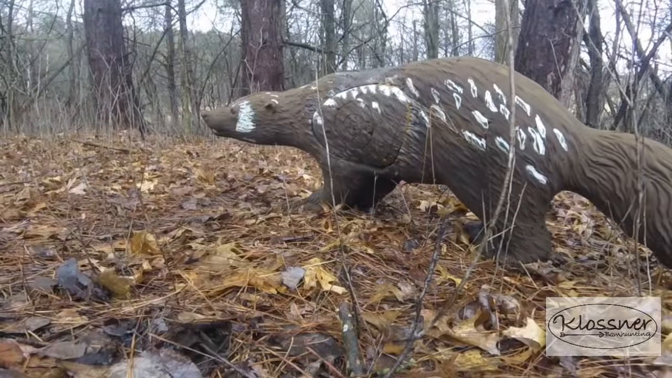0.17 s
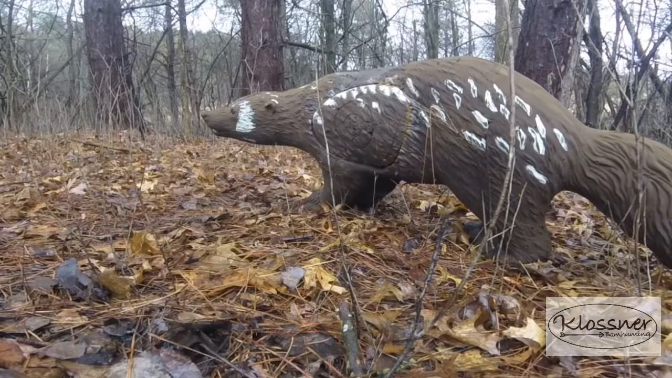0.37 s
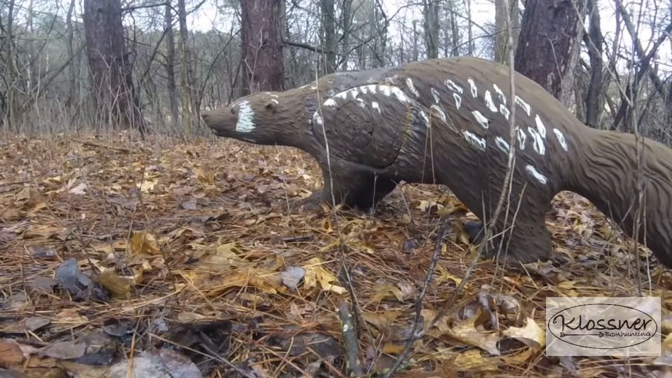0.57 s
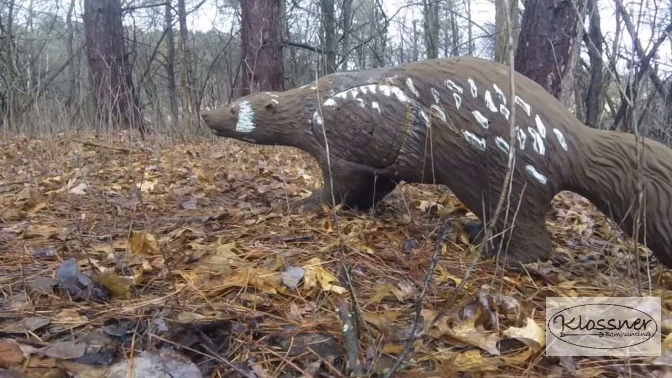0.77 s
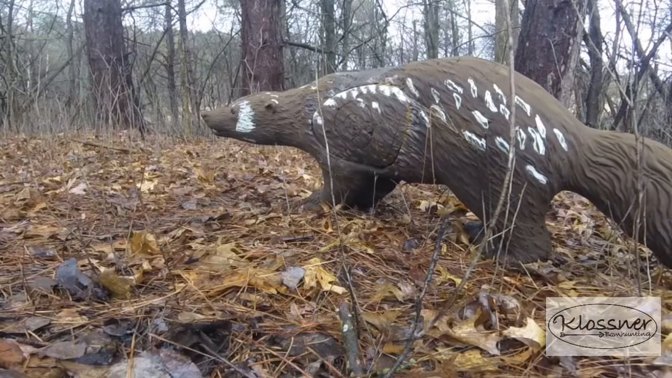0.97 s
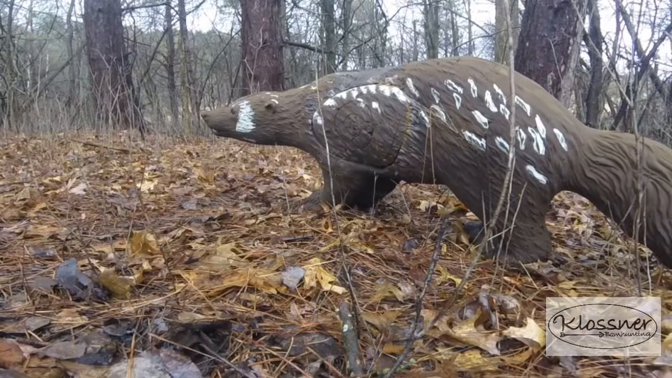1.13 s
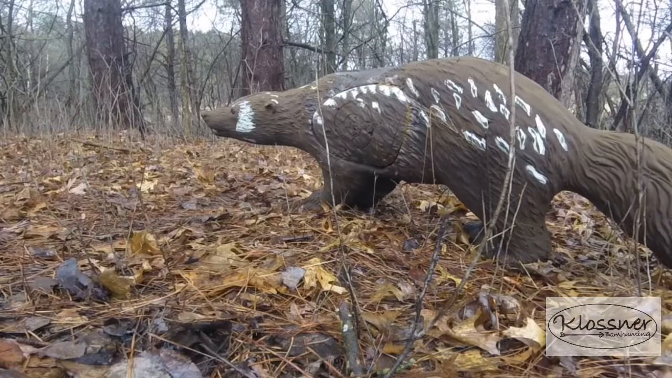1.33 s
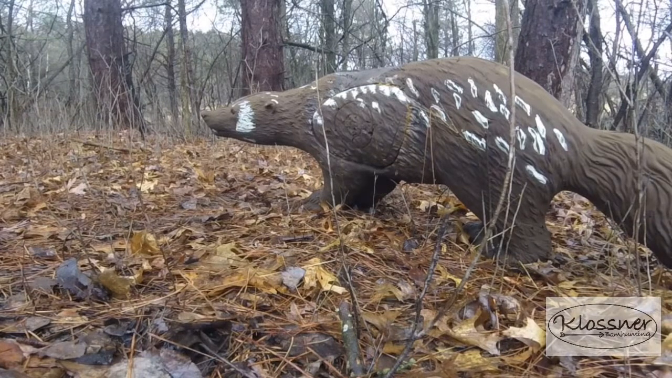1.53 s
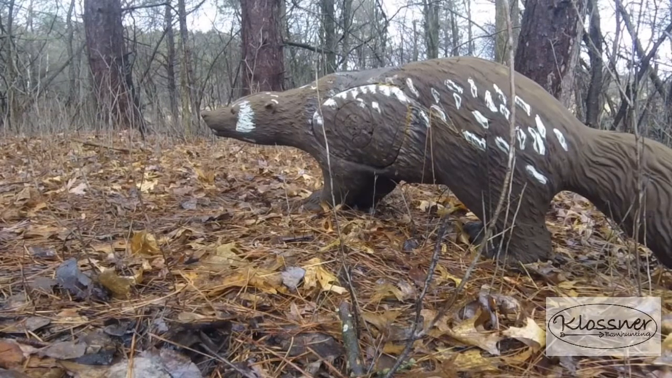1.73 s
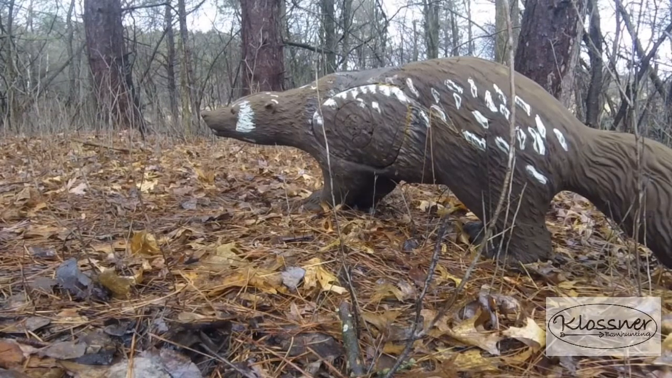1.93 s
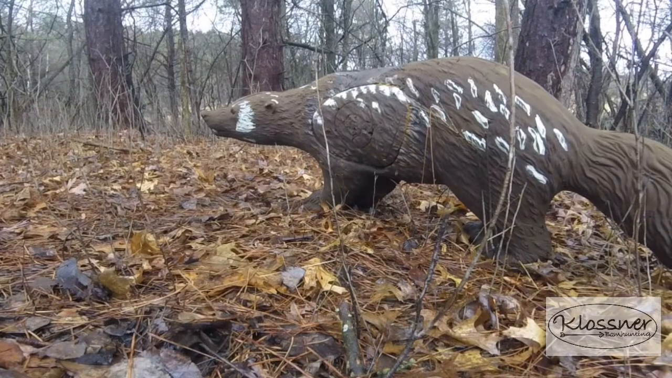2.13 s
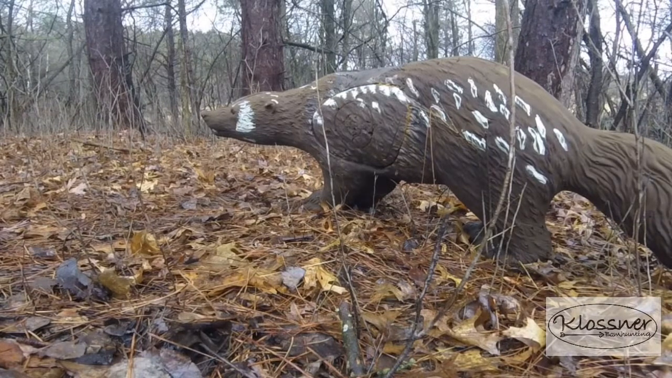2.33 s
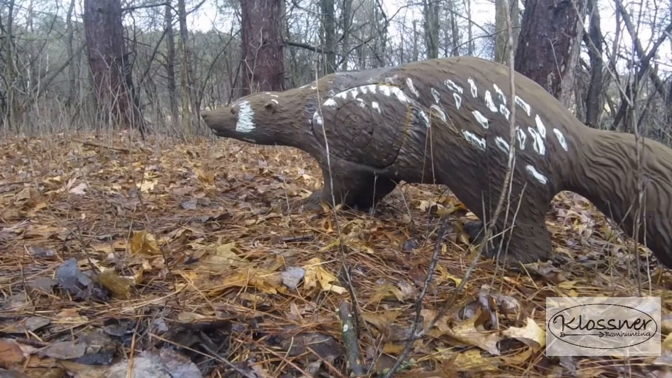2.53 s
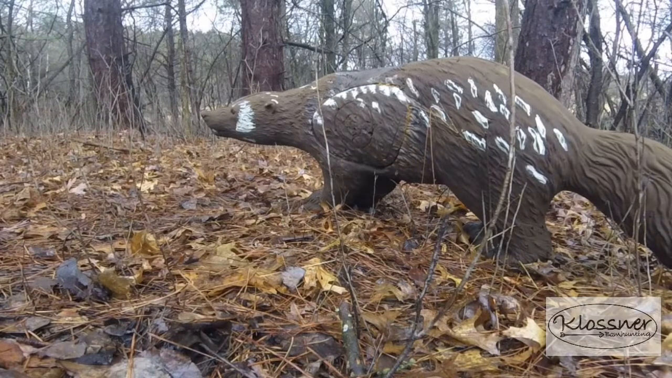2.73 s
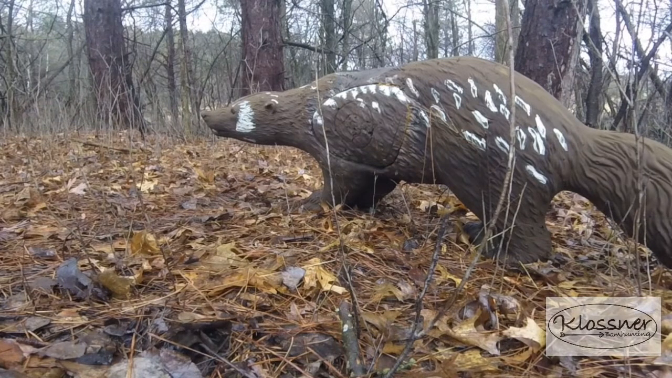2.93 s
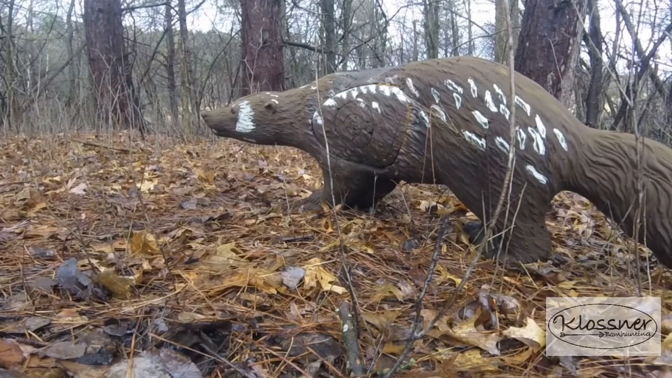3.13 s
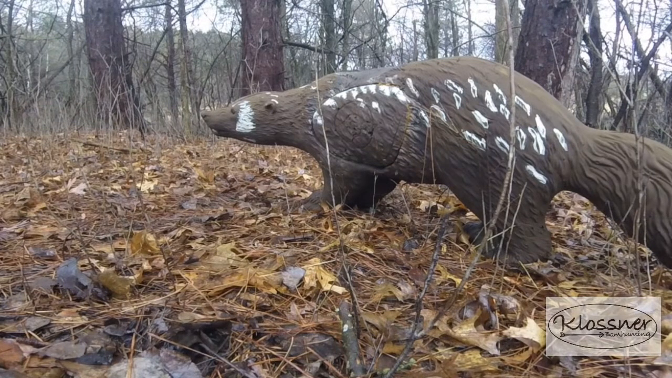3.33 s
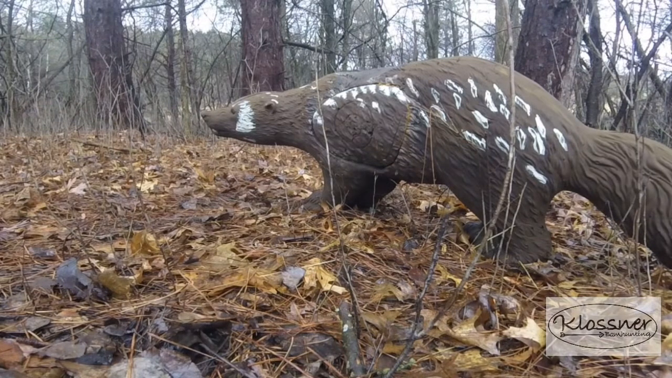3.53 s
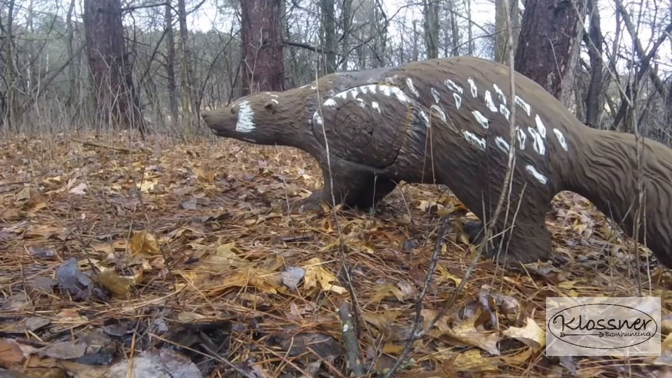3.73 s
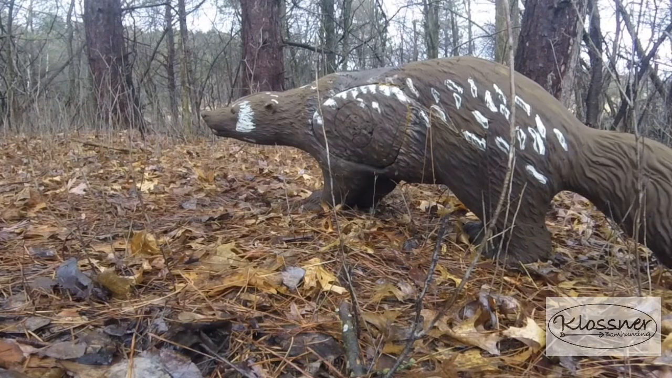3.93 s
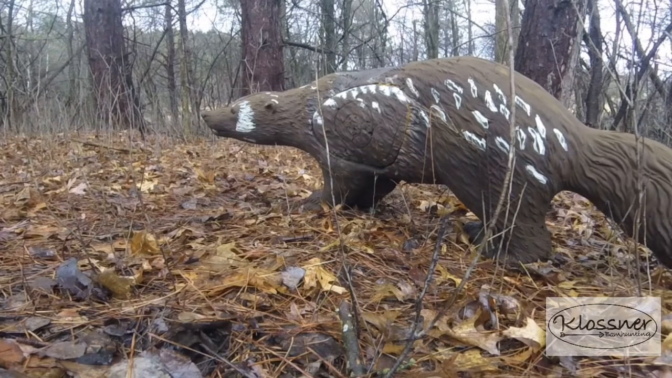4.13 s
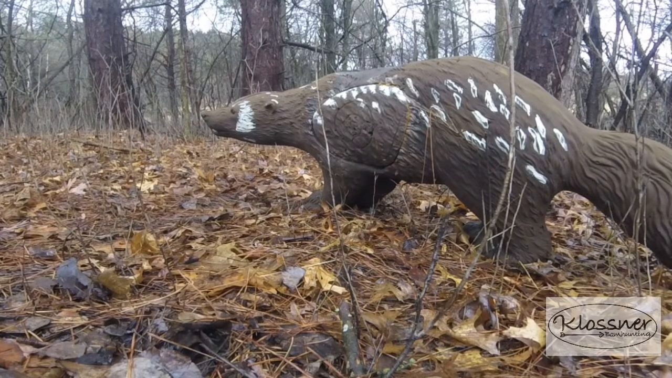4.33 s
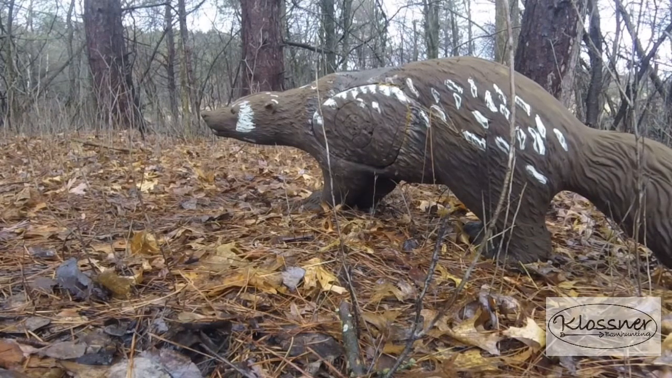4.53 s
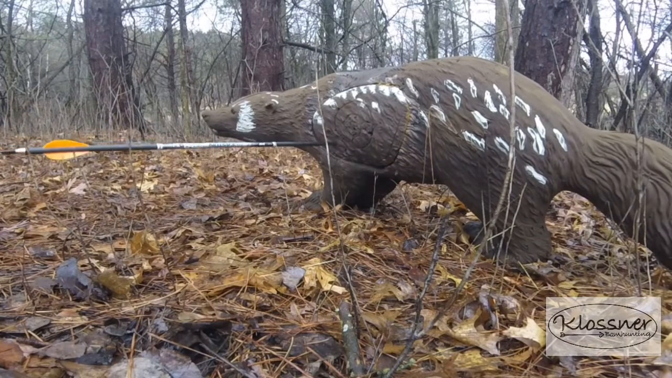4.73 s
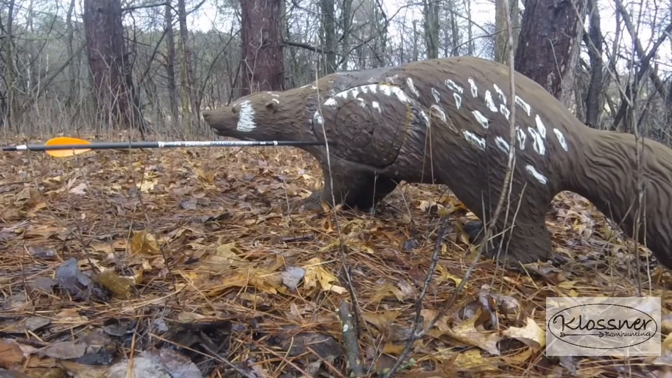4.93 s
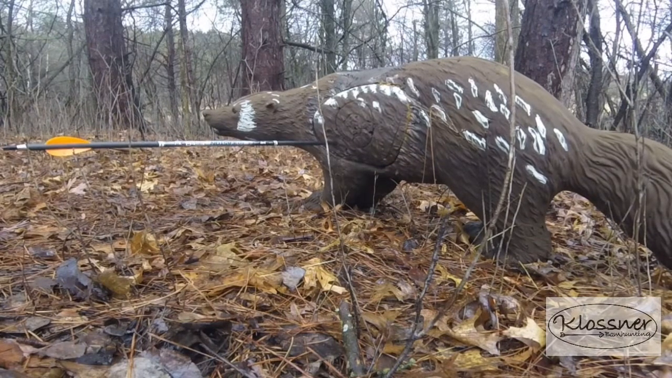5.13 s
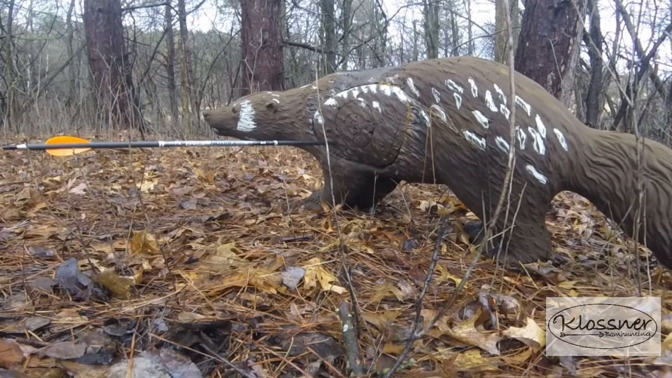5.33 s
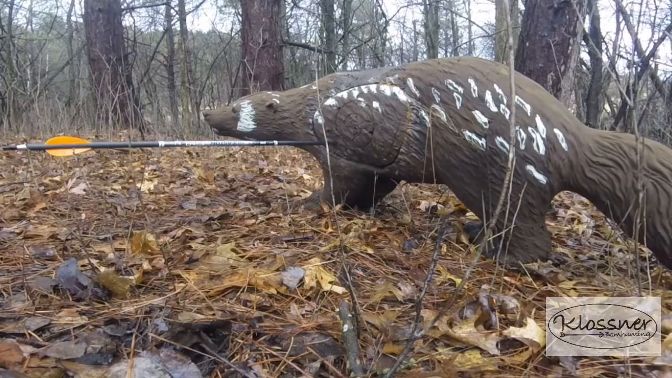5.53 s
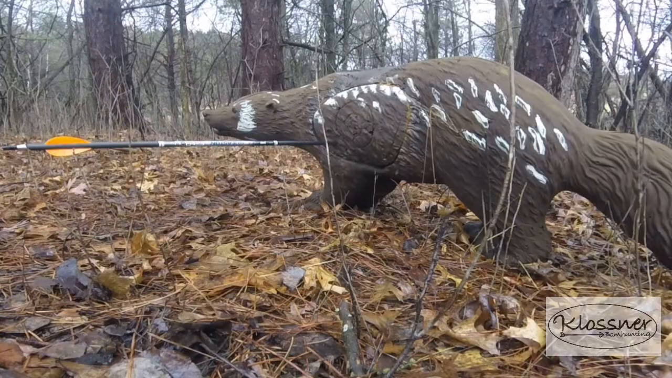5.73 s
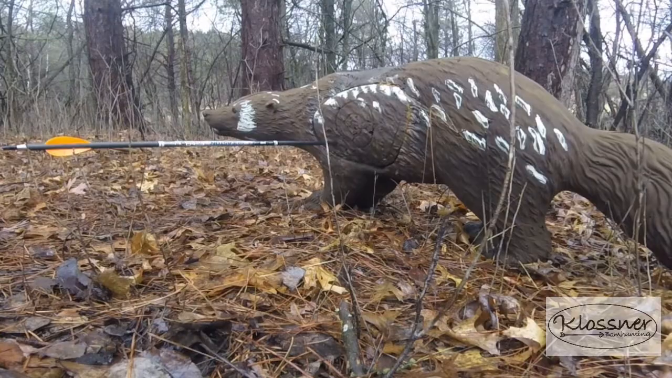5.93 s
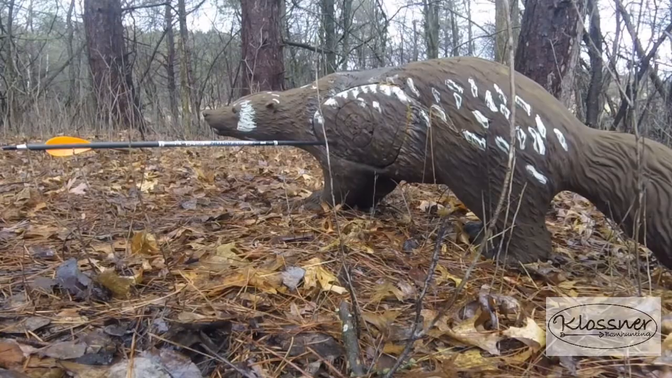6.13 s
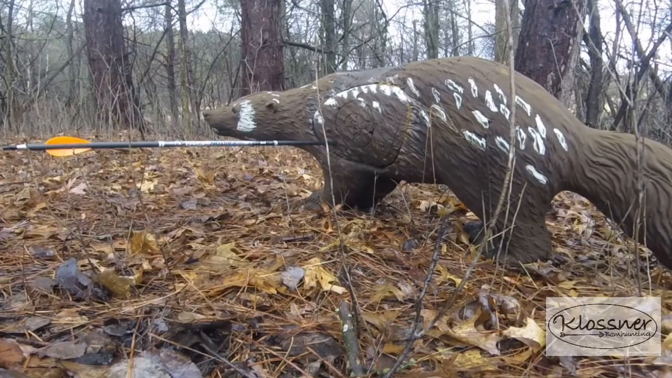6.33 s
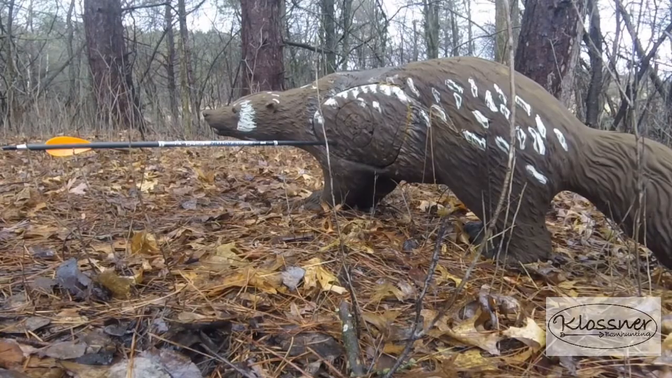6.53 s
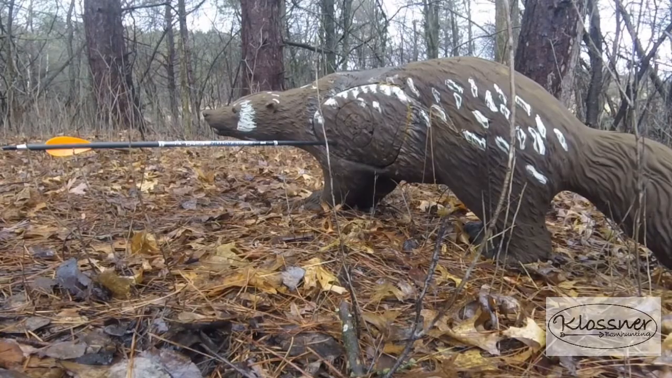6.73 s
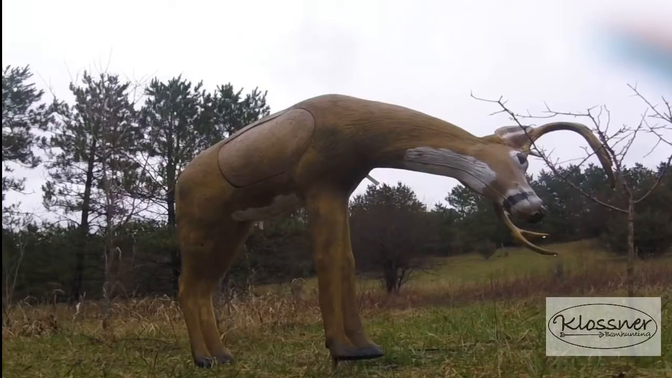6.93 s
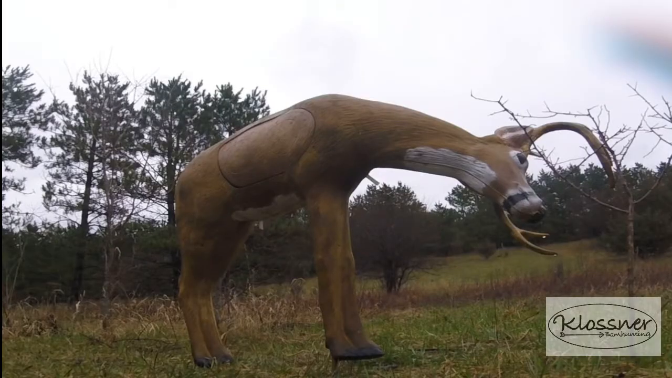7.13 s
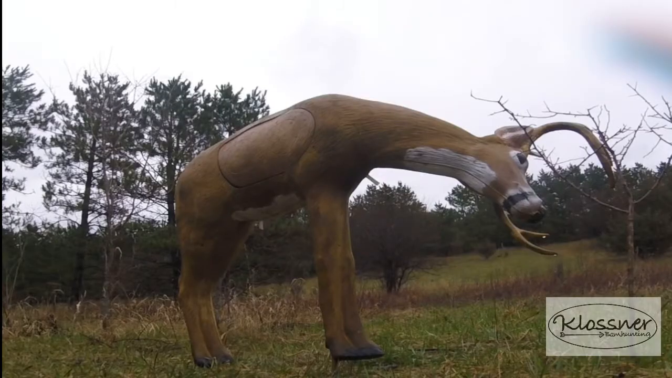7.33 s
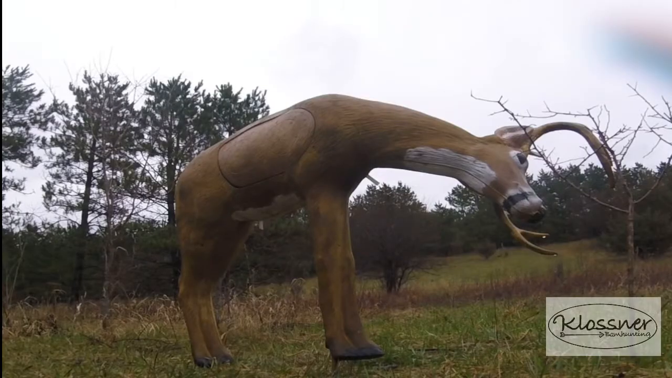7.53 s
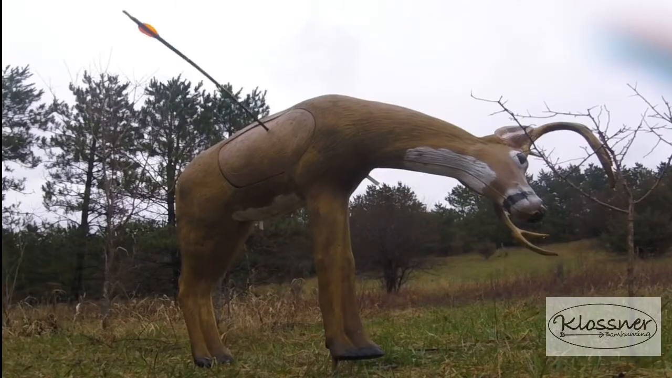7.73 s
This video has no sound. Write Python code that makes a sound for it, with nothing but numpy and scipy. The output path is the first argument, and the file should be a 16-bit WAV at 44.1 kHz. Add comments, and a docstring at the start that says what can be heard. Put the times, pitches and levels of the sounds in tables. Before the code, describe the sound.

From 0 s a calm wood: low wind rumble, thin steady hiss and a faint, wavering engine drone far off, with barely audible ticks in leaf litter. Small, distant birds give thin gliding whistles around 1.5 to 2.4 s and 2.9 to 3.4 s, lightly echoing among trees. At 4.4 s a far bow twangs as a soft, low flutter with rustle; a hiss swells quickly and at 4.6 s the arrow hits foam close by, a very loud, dry crack with tearing and a short thud, then faint echoes. The background drops around the hit and slowly recovers. Birds whistle again from 5.8 to 6.8 s. At 6.85 s the air abruptly changes to a meadow, its drone lower. A sharper bow slap comes at 7.5 s, a brief hiss follows, and a second loud, slightly duller smack lands at 7.8 s, near the end.

```python
"""In a wood, then on a meadow, a far bow twangs and its arrow hisses in and smacks a foam target close by.
Coloured noise makes the rumbling, hissing air; a wavering low tone is a far engine, and gliding tones are birds.
Pulses make the bowstring, swelling noise the flight, and dying tones with tearing noise the hit.
A limiter that looks ahead turns everything down just before each smack, then lets it creep back up."""
import sys
import numpy as np
from scipy import signal
from scipy.fft import irfft
from scipy.io import wavfile
from scipy.ndimage import uniform_filter1d, minimum_filter1d

SR = 44100
rng = np.random.default_rng(int(sys.argv[2]) if len(sys.argv) > 2 else 0)


def log_audio(samples):
    """Write samples as a 16-bit WAV file to the path given in sys.argv[1]."""
    # one column per channel
    frames = np.atleast_2d(samples).T
    # limit to full scale, then quantise
    limited = np.clip(frames, -1, 1)
    pcm = np.round(limited * 32767).astype(np.int16)
    wavfile.write(sys.argv[1], SR, pcm)


N = 347949
MEADOW_STARTS_S = 6.85


def gain_of(db):
    """Turns decibels into a plain multiplier."""
    return 10 ** (np.asarray(db) / 20)


def evened(x):
    """Scales a sound to an average (rms) level of 1."""
    return x / np.sqrt(np.mean(x ** 2) + 1e-20)


def read(points, hz):
    """Reads a curve at any frequency, joining its points by straight lines over log frequency."""
    point_hz, value = np.transpose(points)
    return np.interp(np.log(hz + 1), np.log(point_hz + 1), value)


def add(mix, start_s, sound):
    """Adds a sound into the mix, cut off where the mix ends."""
    part = mix[round(start_s * SR):][:len(sound)]
    part += sound[:len(part)]


def noise(spectrum, size, patchy_db):
    """Coloured noise from random short spectra, with patches that drift louder and softer; rms 1."""
    frames, hz = size // 512 + 5, np.fft.rfftfreq(2048, 1 / SR)
    real, imaginary, patches = rng.standard_normal((frames, 1025, 3)).T
    patches = uniform_filter1d(patches, size=16, axis=0)  # smooth over frequency
    patches = evened(uniform_filter1d(patches, size=6, axis=1))  # smooth over time
    level_db = read(spectrum, hz)[:, None] + patchy_db * patches
    spectra = (real + 1j * imaginary) * gain_of(level_db)
    sound = signal.istft(spectra, nperseg=2048, noverlap=1536)[1]
    return evened(sound[:size])


def wobble(size, hz):
    """Slow random drift: noise with everything much faster than hz filtered away; rms 1."""
    b, a = signal.butter(2, hz, fs=SR)
    drift = signal.lfilter(b, a, rng.standard_normal(size + SR))
    return evened(drift[SR:])  # skip the filter's first second


def ring(modes, wave):
    """Tones struck together, each dying away at its own speed; peak 1."""
    t = np.arange(SR // 5) / SR
    out = np.zeros(len(t))
    for hz, db, t60 in modes:
        out += gain_of(db - 60 * t / t60) * wave(2 * np.pi * hz * t)
    return out / abs(out).max()


def puffs(rows):
    """Short bursts of noise around a centre pitch, each swelling quickly and fading."""
    out = np.zeros(N)
    for start_s, db, hz, length_s in rows:
        colour = [(hz / 3, -18), (hz, 0), (3 * hz, -12), (9 * hz, -60)]
        puff = noise(colour, round(length_s * SR), patchy_db=0)
        swell = np.sin(np.pi * np.linspace(0, 1, len(puff)) ** .5) ** 2
        add(out, start_s, gain_of(db) * puff * swell)
    return out


# How long echoes among the trees last. Each row: frequency in Hz, time to fade by 60 dB in seconds.
TREE_FADES = [(100, .25), (400, .25), (1500, .5), (3000, 0.76), (6000, 0.5), (12000, 0.12)]


def trees(x):
    """Sparse echoes off the trunks, upright or flipped at random, each band dying at its own speed."""
    taps = np.zeros(SR)
    at = np.arange(200, SR - 20, 20)
    taps[at + rng.integers(0, 20, len(at))] = rng.choice([-1., 1.], len(at))
    hz, t, spectra = signal.stft(taps, SR, nperseg=256)
    fade = gain_of(-60 * t / read(TREE_FADES, hz)[:, None])
    tail = signal.istft(spectra * fade, SR, nperseg=256)[1]
    return signal.fftconvolve(x, tail / np.linalg.norm(tail))[:N]


# Colour of the still air, wind rumble and microphone hiss in each place.
# Each row: frequency in Hz, relative level in dB per Hz.
WOOD_AIR = [(12, -42), (22, -8), (45, -6), (91, -7), (125, -11.5), (357, -24), (1960, -32.5), (3600, -39),
            (4200, -45.5), (5000, -42), (6150, -38.5), (6450, -27), (7100, -33), (10200, -44.5),
            (12400, -46.5), (13900, -54), (15000, -75.5)]
MEADOW_AIR = [(12, -41.5), (22, -14), (40, -3.5), (81, -11.5), (123, -10), (210, -20.5), (485, -24.5),
              (2600, -35.5), (4300, -45), (6150, -39), (6450, -26.5), (7100, -34), (12800, -50),
              (13700, -51.5), (14500, -85.5)]
# Average air level, in dB: in the wood, on the meadow.
AIR_LEVELS_DB = [-52, -52.5]


def air():
    """Wind rumble and hiss as gently patchy noise, with one colour for the wood and one for the meadow."""
    cut = round(MEADOW_STARTS_S * SR)
    wood_db, meadow_db = AIR_LEVELS_DB
    wood = gain_of(wood_db) * noise(WOOD_AIR, cut, patchy_db=0.9328)
    meadow = gain_of(meadow_db) * noise(MEADOW_AIR, N - cut, patchy_db=1.2)
    return np.r_[wood, meadow]


# Pitch path of the far engine, dropping where the meadow starts. Each row: time in seconds, pitch in Hz
# before a small random wobble.
ENGINE_PITCH = [(0, 60.53), (.45, 61.65), (.68, 58), (.9, 61.02), (1.6, 61.56), (2.0, 59.24), (2.9, 60.5),
                (3.6, 62.7), (3.95, 62.64), (4.15, 58.84), (4.5, 60.72), (4.95, 59), (5.2, 61.21),
                (6.5, 61.96), (6.84, 63.44), (6.86, 52.6), (7.05, 54.05), (7.2, 50.19), (7.45, 50.59),
                (7.7, 54), (7.89, 55.6)]
ENGINE_DB = -53  # before the wobble in strength


def drone():
    """The engine's low firing tone, unsteady in pitch and strength, with a weak octave above."""
    t = np.arange(N) / SR
    path_hz = np.interp(t, *np.transpose(ENGINE_PITCH))
    turns = np.cumsum(path_hz * (1 + 0.028 * wobble(N, hz=6.))) / SR
    tone = np.sin(2 * np.pi * turns) + gain_of(-18.5) * np.sin(4 * np.pi * turns)
    strength_db = ENGINE_DB + 2.0 * wobble(N, hz=11.0)
    return np.sqrt(2) * gain_of(strength_db) * tone


# Faint ticks in the leaf litter.
# Each row: start in seconds, level in dB before its swell, centre in Hz, length in seconds.
LITTER_TICKS = [(.095, -56, 850, .012), (.678, -66, 5500, .004), (3.232, -63, 5000, .008),
                (3.278, -69, 3000, .004)]


def litter_ticks():
    """Leaf litter ticking, as tiny puffs of noise."""
    return puffs(LITTER_TICKS)


# Whistled notes before warble and flutter; a bigger bend leaves the first pitch sooner.
# Each row: start in seconds, length in seconds, first pitch in Hz, last pitch in Hz, bend (a plain power),
# starting level in dB, change in level by the end in dB.
BIRD_NOTES = [(1.507, 0.0607, 3120, 2929, 2.48, -64.5, 6.5),
              (1.579, 0.0453, 3068, 2048, 1.15, -53.5, -13.5), (1.712, .045, 2280, 2300, 1.4, -60, -4),
              (2.095, 0.01726, 2724, 2480, 1.22, -64.5, -4), (2.114, 0.0264, 2375, 2292, 2.5, -60, -0.5),
              (2.133, 0.126, 2749, 2396, 2.39, -60, -7.5), (2.256, 0.032, 2899, 2410, 1.17, -59.5, -3),
              (2.287, 0.086, 2349, 2014, 2.89, -60, -11.5), (2.943, .03, 6848, 6800, 1.253, -64, -0.5),
              (3.034, 0.107, 2935, 2413, 1.61, -56.5, -3), (3.137, .035, 2058, 1884, 1.63, -59, -9.5),
              (3.138, .052, 5600, 6450, 4, -75, -1.5), (3.248, .19, 5000, 5680, 26, -70, -13),
              (3.205, 0.0142, 3170, 2460, 1.2, -64.5, 4.5), (3.209, 0.125, 1877, 2293, 2.1, -61, -1.5),
              (5.779, 0.027, 2850, 2558, 1.07, -61.5, -4.5), (5.815, 0.13, 2728, 2429, 3.05, -59.5, -11.5),
              (5.938, 0.1134, 2850, 2103, 2.66, -58, -4), (6.045, 0.067, 2170, 2171, 1.12, -61, -10),
              (6.44, .02, 2800, 2950, 1.2, -64, -1.5), (6.47, .085, 2750, 2620, .7, -56, 0),
              (6.556, .018, 3050, 2480, 1.2, -62, -4), (6.576, 0.1183, 2114, 2093, 1.47, -65, 1.5),
              (6.707, 0.0316, 3110, 2403, 2.5, -57.5, -12.5), (6.756, 0.077, 2440, 2490, 1.03, -72, 0.5)]
NOTE_RISE_S, NOTE_FALL_S = 0.0088, 0.00355
WARBLE, FLUTTER_DB = .006, 2.5  # typical size: share of the pitch, and dB of level


def birds():
    """Near-pure gliding whistles, a little fluttering from the distance."""
    out = np.zeros(N)
    for start_s, length_s, first_hz, last_hz, bend, db, change_db in BIRD_NOTES:
        t = np.arange(0, length_s, 1 / SR)
        hz = last_hz + (first_hz - last_hz) * (1 - t / length_s) ** bend
        hz *= 1 + WARBLE * wobble(len(t), hz=50.)
        edge = np.minimum(t / NOTE_RISE_S, 1) * np.minimum((length_s - t) / NOTE_FALL_S, 1)
        level_db = db + change_db * t / length_s + FLUTTER_DB * wobble(len(t), hz=70.)
        whistle = np.sin(2 * np.pi * np.cumsum(hz) / SR)
        add(out, start_s, np.sqrt(2) * gain_of(level_db) * edge * whistle)
    return out


# Single late echoes off trunks and ground.
# Each row: start in seconds, level in dB before its swell, centre in Hz, length in seconds.
LATE_ECHOES = [(4.647, -43.5, 210, 0.03), (7.836, -43, 1720, 0.028)]


def late_echoes():
    """Trunks and ground sending back a late echo, as a short puff of noise."""
    return puffs(LATE_ECHOES)


# Each bow let go. Each row: start in seconds, first string slap in dB, slap sharpness in Hz,
# rustle in dB before its rise and fade, time for the rustle to fade by 60 dB in seconds.
BOW_SHOTS = [(4.375, -39, 337.4, -54, .6), (7.5246, -33, 1150, -46, 0.187)]
# Colour of the rustle. Each row: frequency in Hz, relative level in dB.
RUSTLE_COLOUR = [(100, -19.5), (200, 3.5), (600, -8.5), (1500, -7.5), (3000, -13.5), (4200, -18.5),
                 (5300, -10.5), (7000, -20), (10000, -34), (13000, -69)]
STRING_S, STRING_FADE_DB = .0105, -5.5  # the string slaps again after each swing, weaker


def bows():
    """The string slaps several times as brief pulses, and limbs and shaft rustle away as fading noise."""
    out = np.zeros(N)
    for start_s, slap_db, sharp_hz, rustle_db, t60 in BOW_SHOTS:
        u = np.pi * sharp_hz * (np.arange(441) - 220) / SR
        slap = -(1 - 1.07 * u ** 2) * np.exp(-u ** 2)  # a dip with a small bump on each side
        for k in range(5):
            add(out, start_s + k * STRING_S - 220 / SR, gain_of(slap_db + k * STRING_FADE_DB) * slap)
        t = np.arange(SR // 2) / SR
        shape = gain_of(rustle_db - 60 * t / t60) * (1 - np.exp(-t / 0.0042))
        add(out, start_s - .008, shape * noise(RUSTLE_COLOUR, len(t), patchy_db=0))
    return out


# Each arrow in the air. Each row: leaving time in seconds, launch level in dB, arrival level in dB,
# time to cover the last stretch past the microphone in seconds.
ARROW_FLIGHTS = [(4.398, -59, -36.5, 0.0039), (7.552, -66, -39, 0.0076)]
# Colour of the hissing feathers. Each row: frequency in Hz, relative level in dB.
FEATHER_COLOUR = [(300, -10), (1500, -8), (3000, -8), (4200, -12), (5300, -3), (6500, -1), (8000, -9),
                  (11000, -26), (14000, -70)]
# When each arrow lands, in seconds.
LANDINGS_S = [4.60405, 7.79295]
LAUNCH_FADE_DB_PER_S = -64


def flights():
    """The launch whoosh dies away, then the hiss swells as the arrow nears and stops at the target."""
    out = np.zeros(N)
    for (start_s, launch_db, arrival_db, near_s), lands_s in zip(ARROW_FLIGHTS, LANDINGS_S):
        t = np.arange(0, lands_s - start_s, 1 / SR)
        time_left = t[::-1]
        launch = gain_of(launch_db + LAUNCH_FADE_DB_PER_S * t)
        arrival = gain_of(arrival_db) / (1 + (time_left / near_s) ** 2)
        ends = signal.windows.tukey(len(t), .02)  # short fades at both ends
        add(out, start_s, (launch + arrival) * ends * noise(FEATHER_COLOUR, len(t), patchy_db=0))
    return out


# Each landing, with levels before shaping and limiting. Each row: crack in dB, delay of its repeat in seconds,
# repeat compared with the crack in dB, thud in dB, tearing in dB, near scatter in dB, far echoes in dB.
LANDINGS = [(19, .0004, -9, -3, 0, -21.5, -42.5), (12, 0.000917, -18, -1, -8, -28, -54.5)]
# How long after landing each shaft stops, in seconds.
SHAFT_STOPS_S = [.0035, .003]
# The tip bursting the skin of each target, one list per target.
# Each row: pitch in Hz, relative level in dB, time to fade by 60 dB in seconds.
TARGET_SKINS = [
    [(350, -13.5, 0.019), (1735, -5.5, 0.006), (2700, -2, 0.0031), (4370, -11, .005), (5125, 3.5, 0.0046),
     (6184, -18.5, .008), (8950, -18, .004), (12430, -23.5, .003), (15000, -25.5, .003)],
    [(500, -15, 0.0014), (1085, -1.5, 0.0026), (2029, -2.5, 0.0036), (3050, -13, 0.0043),
     (5360, -7.5, 0.0049), (7260, -14.5, 0.0043), (11000, -23, .003), (14500, -21.5, .003)],
]
# The foam body of each target thudding as the shaft stops, one list per target.
# Each row: pitch in Hz, relative level in dB, time to fade by 60 dB in seconds.
TARGET_BODIES = [
    [(115, -7, .07), (178.4, -9.5, 0.055), (253.85, -10.5, 0.074), (431, 6, 0.016), (464.8, -16, 0.1),
     (590, 3, .014)],
    [(161, -19, 0.12), (265, 1, 0.022), (371.2, 0.5, 0.026), (770, 9, 0.0097), (1000, -2, 0.01)],
]
# Colour of tearing foam. Each row: frequency in Hz, relative level in dB.
TEAR_COLOUR = [(150, -7), (400, 4), (1200, -7), (3000, -3), (4000, -10.5), (5200, -1), (6500, -9.5),
               (9000, -24.5), (13000, -49)]


def hits():
    """The skin cracks, repeats off the ground and tears; the foam thuds; scatter returns from near and far."""
    out = np.zeros(N)
    # longer contact softens a blow: smoothing over 9 or 31 samples
    sharp, soft = signal.windows.hann(9) / 4, signal.windows.hann(31) / 15
    t = np.arange(SR // 4) / SR
    click = irfft(gain_of(read(TEAR_COLOUR, np.fft.rfftfreq(440, 1 / SR))))
    click = evened(np.fft.fftshift(click))  # one click of the tearing colour
    for s, stop_s, row, skin, body in zip(LANDINGS_S, SHAFT_STOPS_S, LANDINGS, TARGET_SKINS, TARGET_BODIES):
        crack_db, repeat_s, repeat_db, thud_db, tear_db, scatter_db, echo_db = row
        crack = -gain_of(crack_db) * np.convolve(ring(skin, np.cos), sharp)
        add(out, s - 4 / SR, crack)
        add(out, s - 4 / SR + repeat_s, gain_of(repeat_db) * crack)
        thud = gain_of(thud_db) * np.convolve(ring(body, np.sin), soft)
        add(out, s + stop_s - 15 / SR, thud)
        # tearing lasts a few ms, then ground litter and the nearest stems scatter it back
        fade = gain_of(tear_db - 60 * t / 0.0076) + gain_of(scatter_db - 60 * t / 0.043)
        rise = 1 - np.exp(-t / 0.00059)
        add(out, s + 0.00023, fade * rise * noise(TEAR_COLOUR, len(t), patchy_db=0))
        burst = np.zeros(N)
        add(burst, s, click)
        out += gain_of(echo_db) * trees(burst)
    return out


def scene():
    """Adds all sources, with the birds and bows also echoing among the trees."""
    song, bow = birds(), bows()
    song_echo, bow_echo = gain_of(-8.5) * trees(song), gain_of(-11) * trees(bow)
    background = air() + drone() + litter_ticks() + song + song_echo
    shots = late_echoes() + bow + bow_echo + flights() + hits()
    return (background + shots)[None]


def limited(x, ahead_s):
    """Sees each peak coming, drops the gain to keep it under the ceiling, then recovers at a steady rate."""
    need = np.minimum(.775 / (abs(x) + 1e-9), 1)  # ceiling .775
    size = round(ahead_s * SR)
    need = minimum_filter1d(np.r_[need, np.ones(size)], size=2 * size + 1)[:len(x)]
    need = uniform_filter1d(need, size=221)  # smooth the drop over 5 ms
    climb = np.arange(len(x)) * 0.2123 / SR  # gain regained each second
    gain = np.minimum.accumulate(need - climb) + climb
    return x * np.minimum(gain, 1)


def record(dry):
    """Limits the wood and the meadow separately, then removes the highest treble."""
    cut = round(MEADOW_STARTS_S * SR)
    wood = limited(dry[0, :cut], ahead_s=.0505)
    meadow = limited(dry[0, cut:], ahead_s=.0445)
    low_pass = signal.firwin(511, 16600, window=("kaiser", 9), fs=SR)  # treble edge in Hz
    return signal.oaconvolve(np.r_[wood, meadow], low_pass, "same")[None]


dry = scene()
out = record(dry)
log_audio(out)
```